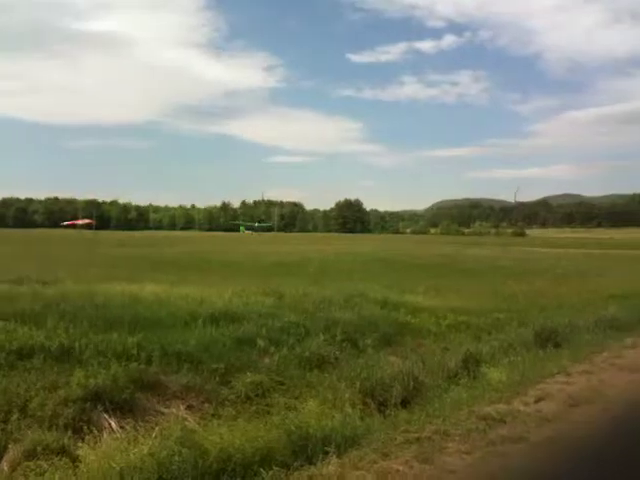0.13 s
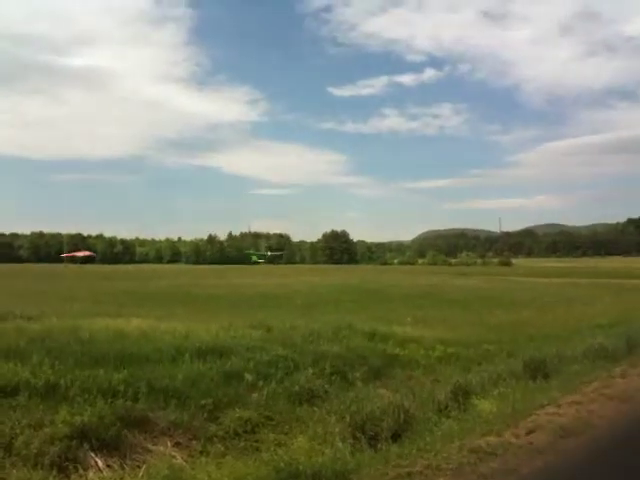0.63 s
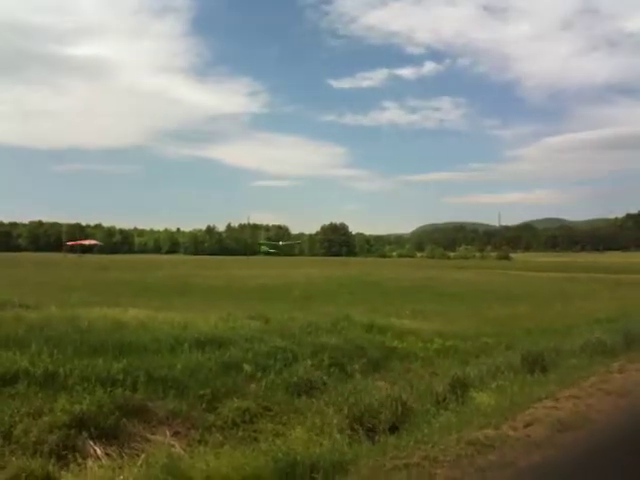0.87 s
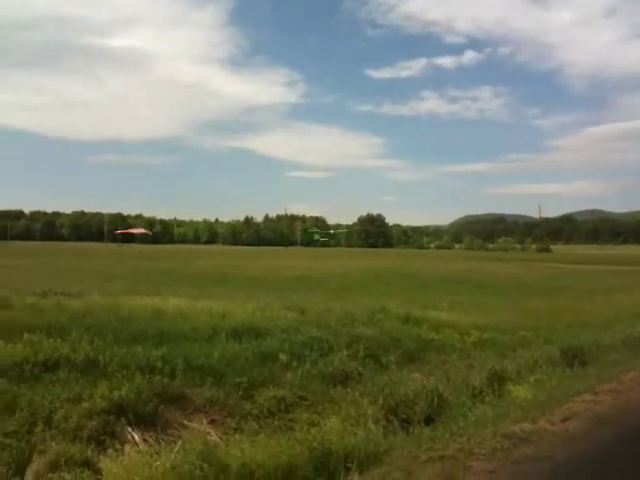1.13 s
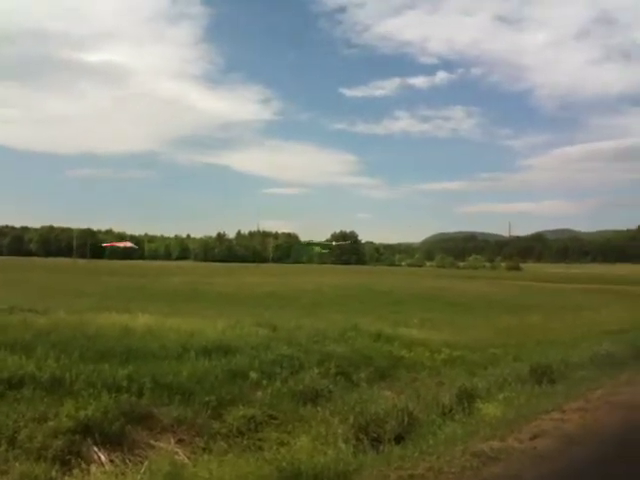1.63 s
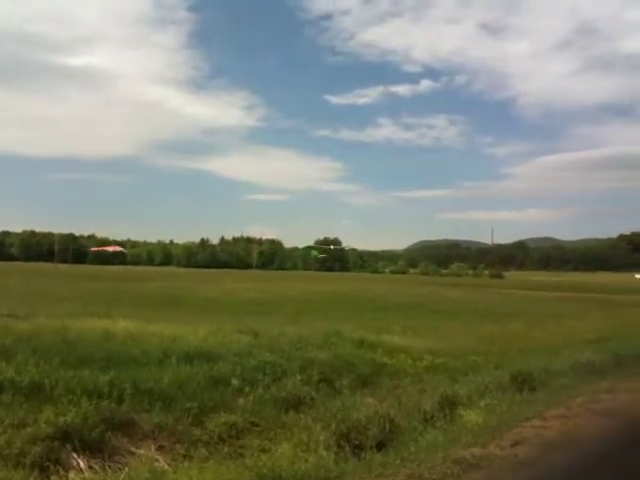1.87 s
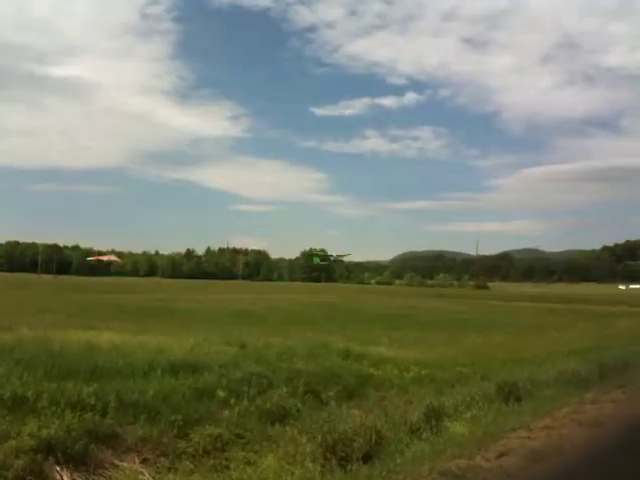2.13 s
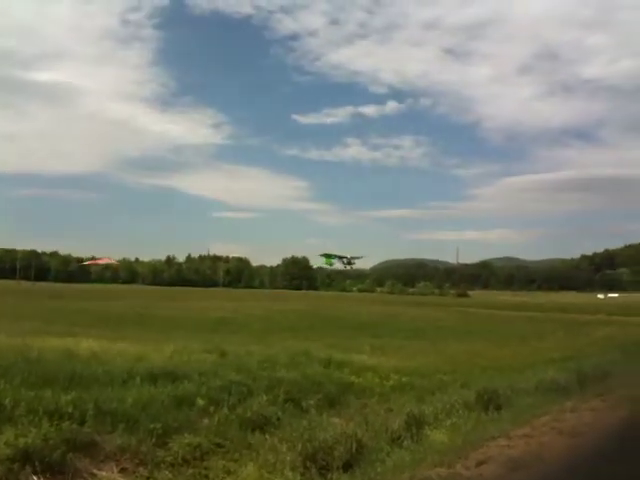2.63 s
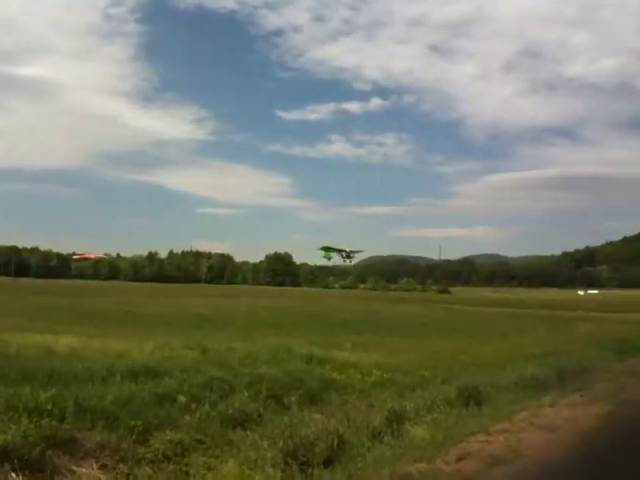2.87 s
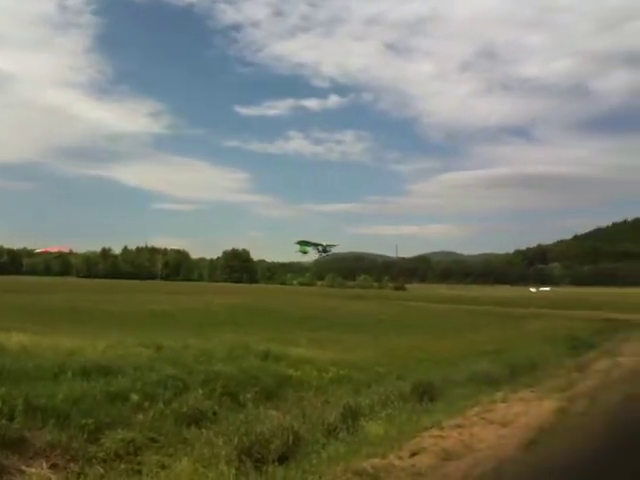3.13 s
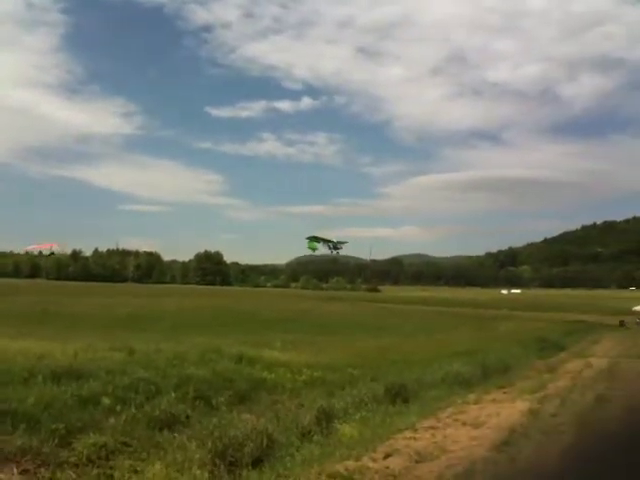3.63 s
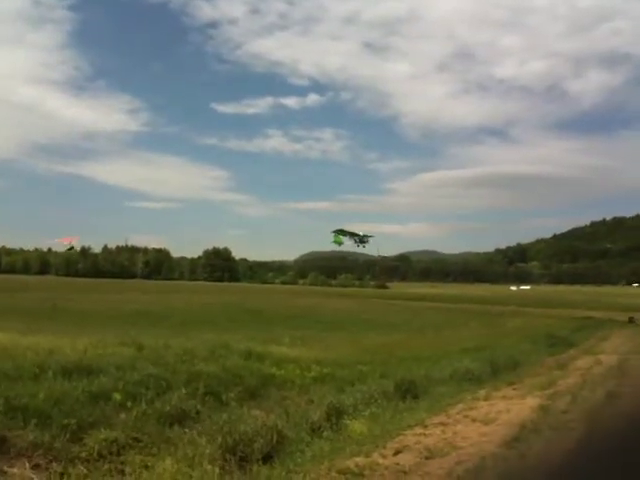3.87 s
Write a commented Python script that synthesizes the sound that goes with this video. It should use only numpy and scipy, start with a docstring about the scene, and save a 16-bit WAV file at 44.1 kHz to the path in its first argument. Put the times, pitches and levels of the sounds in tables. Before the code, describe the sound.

A small propeller plane climbs from a distant grass field, its steady buzzing drone and hoarse airy roar slowly swelling; light low wind puffs touch the outdoor microphone early on.

```python
"""A buzzing engine drone and a hoarse roar are heard together from the start: a small propeller aircraft climbs
off a grass field, far from the microphone. Wavering sines on multiples of the shaft speed make the drone; bands
of noise make the roar, which throbs with blades and firing while its bands swell and fade.
A close reflection cuts notches in the treble, and light wind puffs low noise onto the microphone."""
import sys
import numpy as np
from scipy import signal
from scipy.fft import rfft, irfft
from scipy.io import wavfile
from scipy.ndimage import map_coordinates

SR = 44100
rng = np.random.default_rng(int(sys.argv[2]) if len(sys.argv) > 2 else 0)


def elevation(decibels):
    """Turn decibel levels (scalar or array-like) into linear amplitude ratios."""
    levels = np.asarray(decibels, float)
    return 10 ** (levels / 20)


def transcribe(u):
    """Save the signal u as a 16-bit wav file named by the first command-line argument.

    u: samples, shape (n,) or (channels, n), limited to [-1, 1]; the rate is SR.
    q: integer samples, one column per channel.
    """
    v = np.clip(np.atleast_2d(u).T, -1, 1)
    q = np.round(v * 32767).astype(np.int16)
    wavfile.write(sys.argv[1], SR, q)


N = 176400  # samples, 4 s


def rms_one(x):
    """Scale to rms 1."""
    return x / np.sqrt(np.mean(x ** 2) + 1e-20)


def in_time(rows):
    """Columns of a table whose rows start with seconds, interpolated sample by sample."""
    s, *columns = np.transpose(rows)
    return np.array([np.interp(np.arange(N) / SR, s, c) for c in columns])


def swings(rows):
    """Level curves in dB around their own means."""
    levels = in_time(rows)
    return levels - levels.mean(axis=1, keepdims=True)


def between(curves, at_hz, where_hz):
    """Blend of the two curves that lie next to a frequency on a log axis."""
    place = np.interp(np.log(where_hz), np.log(at_hz), np.arange(len(at_hz)))
    low = min(int(place), len(at_hz) - 2)
    return curves[low] + (place - low) * (curves[low + 1] - curves[low])


def drift(rate_hz):
    """Slow random wander of rms 1: noise through a two-pole low-pass, drawn every 40 samples."""
    r = np.exp(-2 * np.pi * rate_hz * 40 / SR)
    noise = rng.standard_normal(N // 40 + 2002)
    slow = signal.lfilter([1], [1, -2 * r, r * r], noise)[2000:]  # skip the filter's settling
    return np.interp(np.arange(N) / 40, np.arange(len(slow)), rms_one(slow - slow.mean()))


def band(x, low_hz, high_hz, order=2):
    """Butterworth band-pass."""
    return signal.sosfilt(signal.butter(order, [low_hz, high_hz], "band", fs=SR, output="sos"), x)


# Engine speed as heard at the microphone. Each row: time in seconds, frequency of the 8th shaft order in Hz.
ENGINE_SPEED = [(.15, 450.5), (.55, 449.6), (1.15, 449.1), (2.65, 449.1), (3.25, 447.4), (4, 447)]


def shaft_angle():
    """Angle of the engine shaft in radians, summed from its turns per second."""
    shaft_hz = in_time(ENGINE_SPEED)[0] / 8
    return 2 * np.pi * np.cumsum(shaft_hz) / SR


# Lower bands of the distant roar; only the swing around each column's mean is heard.
# Each row: time in seconds, then level in dB near 330, 620 and 1200 Hz.
ROAR_BODY = [(.15, -69, -57.5, -51), (.4, -70.5, -57, -46.5), (.65, -65, -53.5, -55),
             (1.0, -69.5, -51, -49), (1.5, -65, -48.5, -44.5), (1.9, -67.5, -50, -44.5),
             (2.2, -63, -48.5, -41.5), (2.5, -62.5, -45, -40.5), (2.8, -61.5, -43.5, -44),
             (3.1, -57, -42.5, -44.5), (3.4, -58, -42.5, -48.5), (3.75, -55, -41.5, -44.5),
             (4, -52, -49.5, -47)]
# Treble of the roar, swelling and fading, again heard as swing around the means.
# Each row: time in seconds, then level in dB near 2200, 4000 and 7000 Hz.
ROAR_TREBLE = [(0.15, -48.5, -56, -64.5), (0.29, -45, -55, -71), (0.41, -42, -51.5, -61.5),
               (0.61, -48, -52.5, -60.5), (0.68, -44.5, -66, -66), (0.86, -45.5, -60, -60),
               (1.1, -45, -64, -68), (1.28, -43, -53, -56), (1.34, -40.5, -58, -64),
               (1.38, -39.5, -52, -60.5), (1.87, -45.5, -58.5, -66.5), (1.93, -43.5, -65.5, -68),
               (2.05, -44, -51, -63), (2.07, -41.5, -55, -59.5), (2.51, -37.5, -55, -62),
               (2.71, -44, -56, -59.5), (2.83, -47.5, -63.5, -69), (2.94, -48.5, -58.5, -64.5),
               (3.02, -44, -59.5, -68.5), (3.09, -40, -54, -63), (3.14, -40, -51.5, -55.5),
               (3.18, -42.5, -56, -61), (3.31, -42, -57.5, -68), (3.49, -41, -52, -59),
               (3.56, -45.5, -50.5, -68), (3.68, -39, -57.5, -62), (3.83, -45.5, -55, -63.5),
               (3.93, -45, -56.5, -67)]
# Centres of those six columns, body first. Each entry: frequency in Hz.
ROAR_CENTRES_HZ = [330, 620, 1200, 2200, 4000, 7000]


def roar_swings():
    """Swing of the level in dB, for the moving-air bands of the roar from low to high."""
    return np.vstack([swings(ROAR_BODY), swings(ROAR_TREBLE)])


# Strengths of the engine's tones, before the overall level.
# Each row: multiple of the shaft speed, relative level in dB.
SHAFT_ORDERS = [(2, -39), (3, -22), (4, -17), (6, -27.5), (8, -1), (10, -13), (11, -22.5), (12, -10),
                (13, -27), (16, -12), (17, -22.5), (18, -18.5), (19, -26), (20, -15), (21, -19.5),
                (24, -23.5), (26, -21.5), (28, -26), (29, -21.5), (30, -18), (32, -17.5), (33, -28.5),
                (34, -20.5), (36, -23), (37, -38), (38, -15), (39, -25.5), (40, -23), (41, -15),
                (42, -20.5), (44, -23.5), (48, -24.5), (50, -33)]
# Rise and fall of the tones at the microphone; only the swing around each column's mean is heard.
# Each row: time in seconds, then level in dB of orders 8, 4, 12, 16, 3, 20, 34 and 48.
TONE_LEVELS = [(.15, -53, -58, -53, -59.5, -60.5, -59.5, -54.5, -64.5),
               (.55, -52, -59, -57, -62, -60.5, -61, -56, -55),
               (.8, -47.5, -61.5, -50, -56.5, -61, -62.5, -57, -61),
               (1.45, -44, -63, -52.5, -51.5, -62.5, -58, -51, -59.5),
               (1.85, -45.5, -59, -48.5, -52.5, -63.5, -58, -56.5, -58.5),
               (2.3, -39.5, -57, -46, -46.5, -69, -50.5, -60, -78),
               (2.55, -37, -58, -45, -49, -65, -49.5, -63, -61),
               (2.75, -38.5, -57.5, -46, -50, -66.5, -56, -62, -70.5),
               (3.15, -35, -52, -46, -50.5, -63.5, -60, -60.5, -57.5),
               (3.55, -36, -50, -49.5, -57, -69, -57.5, -50, -63),
               (4, -34, -52, -50, -57, -78, -47, -60, -70.5)]
# Orders that share each of those level columns. Each row: multiples of the shaft speed.
ORDERS_PER_COLUMN = [(8, 6, 11, 24, 26), (4,), (12,), (16, 18), (3,), (20, 21), (34, 36), (48, 50)]
TONES_DB = -38.5  # added to every order
TONE_WAVER_DB, TONE_WAVER_HZ = 2, 3.6  # rms at order 48, less at lower orders
TONE_BLUR_RAD, TONE_BLUR_HZ = .005, 2.7  # phase wander per order
# how far the orders, and the multiples of the firing rate, stray from one sharp pulse
PULSE_SPREAD_RAD, FIRING_SPREAD_RAD = 2.2, .6


def engine_tones(angle):
    """One sine per shaft order; orders with a level column follow it, the others follow the roar."""
    own_swing = {}
    for orders, swing in zip(ORDERS_PER_COLUMN, swings(TONE_LEVELS)):
        for order in orders:
            own_swing[order] = swing
    roar_db = roar_swings()
    tones = 0
    for order, db in SHAFT_ORDERS:
        if order in own_swing:
            swing = own_swing[order]
        else:
            swing = between(roar_db, ROAR_CENTRES_HZ, 56 * order)  # the shaft turns about 56 times a second
        waver = TONE_WAVER_DB * drift(TONE_WAVER_HZ) * np.log(order) / np.log(48)
        if order == 8:
            waver = 0  # the strongest tone has no waver of its level
        spread = PULSE_SPREAD_RAD if order % 4 else FIRING_SPREAD_RAD  # four firings a turn
        blurred_angle = angle + TONE_BLUR_RAD * drift(TONE_BLUR_HZ)
        tone = np.cos(order * blurred_angle + rng.normal(0, spread))
        tones = tones + elevation(db + swing + waver) * tone
    return elevation(TONES_DB) * tones


# Average colour of the roar as it reaches the microphone, before the overall level.
# Each row: frequency in Hz, gain in dB on the noise per Hz.
ROAR_COLOUR = [(60, -49), (140, -19), (280, -12), (390, -12.5), (500, -3.5), (650, -1), (820, -9),
               (1050, -4), (1350, -6), (2100, -2.5), (2650, -6), (3300, -13.5), (4200, -19), (6000, -19.5),
               (8000, -40), (9500, -83), (10500, -33), (12000, -70), (15000, -74)]
ROAR_DB = -44.5  # rms before swings and throb
PATCHY_DB, PATCHY_HZ = 1.33, 5.3  # random swelling of each band, half as deep in the bass
BLADES_PER_TURN = 1.5  # blade passes per turn of the engine shaft
BLADE_THROB, BLADE_SHARP, FIRING_THROB = .1, .11, .13  # depths, as a share of the level
THROB_FROM_HZ = 1100  # the throb sets in at half of this and is full at one and a half times


def roar(angle):
    """Exhaust and propeller noise in third-octave bands; the upper ones throb with blades and firing."""
    hz, db = np.transpose(ROAR_COLOUR)
    blade = BLADES_PER_TURN * angle
    blade_throb = BLADE_THROB * np.cos(blade) + BLADE_SHARP * np.cos(2 * blade)
    firing_throb = FIRING_THROB * np.sin(4 * angle + np.sin(4 * angle))  # a lopsided pulse
    throb = 1 + blade_throb + firing_throb
    white = rng.standard_normal((2, N))  # neighbouring bands take different noise
    roar_db = roar_swings()
    edges_hz = 60 * 2 ** (np.arange(25) / 3)
    steady, moving = 0, 0
    for k, (low, high) in enumerate(zip(edges_hz, edges_hz[1:])):
        centre = np.sqrt(low * high)
        colour = elevation(np.interp(np.log(centre), np.log(hz), db))
        noise = colour * band(white[k % 2], low, high)
        steady = steady + noise
        share = np.clip(centre / THROB_FROM_HZ - .5, 0, 1)
        patches = PATCHY_DB * (.5 + .5 * share) * drift(PATCHY_HZ)
        swell = elevation(between(roar_db, ROAR_CENTRES_HZ, centre) + patches)
        moving = moving + noise * swell * (1 + share * (throb - 1))
    return elevation(ROAR_DB) * moving / steady.std()


# Close reflection, arriving inverted just after the direct sound.
# Each row: time in seconds, delay in ms, strength in its upper and in its lower band (share of the direct sound).
REFLECTION = [(.15, 1.62, .8, .05), (.55, 1.655, .8, .05), (.85, 1.71, .7, .1), (1.5, 1.765, .85, .05),
              (2.4, 1.745, .85, .05), (2.9, 1.81, .6, .15), (3.2, 1.78, .3, .15), (3.45, 1.7, .15, .65),
              (4, 1.75, .3, .75)]
REFLECTION_HZ, REFLECTION_OCTAVES = (2750, 1850), (.5, .3)  # centre and width, upper and lower band


def reflected(x):
    """The direct sound minus a delayed copy of two broad bands, which cancels it at some frequencies."""
    delay_ms, *strengths = in_time(REFLECTION)
    hz = np.arange(N // 2 + 1) * SR / N + 1  # 1 Hz up, to keep the log finite
    bounced = 0
    for strength, centre, octaves in zip(strengths, REFLECTION_HZ, REFLECTION_OCTAVES):
        bell = np.exp(-.5 * (np.log2(hz / centre) / octaves) ** 2)
        bounced = bounced + strength * irfft(rfft(x) * bell, N)
    late = map_coordinates(bounced, [np.arange(N) - delay_ms * SR / 1000], order=3)
    return x - late


# Light wind on the microphone. Each row: time in seconds, level in dB before the trim.
WIND = [(.15, -59), (.26, -62.5), (1.04, -63.5), (1.09, -55), (1.15, -61), (1.29, -66), (1.32, -51.5),
        (1.4, -63.5), (1.9, -63), (2.3, -67.5), (2.7, -65), (4, -73.5)]
WIND_LOW_HZ, WIND_HIGH_HZ = 99, 195
WIND_TRIM_DB, WIND_LUMPY_DB, WIND_LUMPY_HZ = 1, 1.6, 12.0


def wind():
    """Air puffing on the microphone: low band-passed noise with a lumpy level."""
    lumps = elevation(in_time(WIND)[0] + WIND_TRIM_DB + WIND_LUMPY_DB * drift(WIND_LUMPY_HZ))
    return lumps * rms_one(band(rng.standard_normal(N), WIND_LOW_HZ, WIND_HIGH_HZ))


def microphone_hiss():
    """Faint white noise of the microphone."""
    return elevation(-83) * rng.standard_normal(N)


def scene():
    """Aircraft with its reflection, and wind."""
    angle = shaft_angle()
    aircraft = engine_tones(angle) + roar(angle)
    return (reflected(aircraft) + wind())[None]


MIC_LOW_HZ = 61.5  # bass cut of the microphone
START_S, ONSET_S = .131, .0015  # silence, then the sound sets in at once


def band_limit(x):
    """A steep low-pass at the top of the band."""
    return signal.sosfilt(signal.butter(12, 15719, fs=SR, output="sos"), x)


def record(dry):
    """Adds hiss, cuts the bass and keeps silence until the start."""
    bass_cut = signal.butter(3, MIC_LOW_HZ, "high", fs=SR, output="sos")
    heard = signal.sosfilt(bass_cut, dry + microphone_hiss())
    onset = np.clip((np.arange(N) / SR - START_S) / ONSET_S, 0, 1)
    return band_limit(heard * onset)


dry = scene()
out = record(dry)
transcribe(out)
```